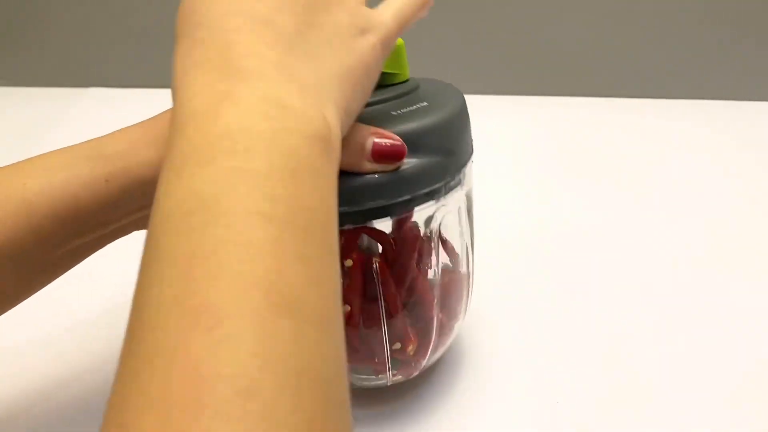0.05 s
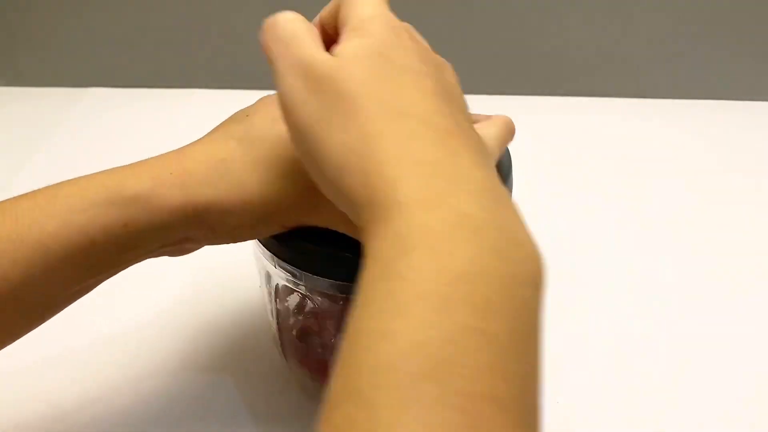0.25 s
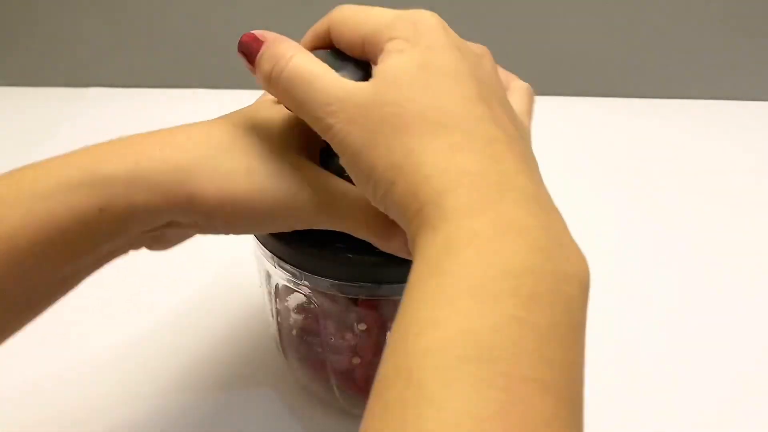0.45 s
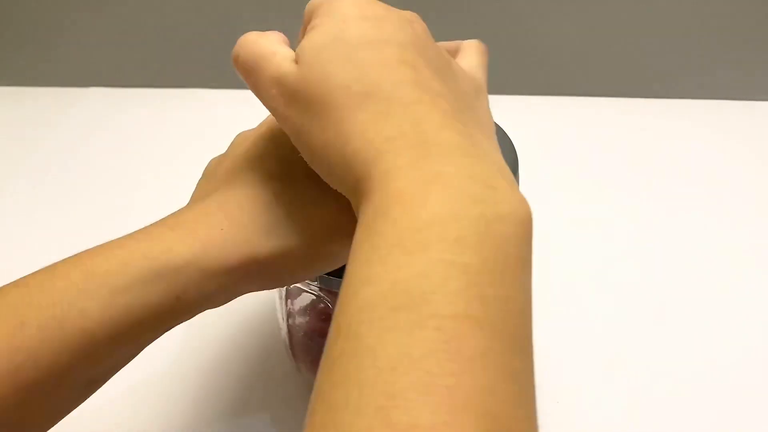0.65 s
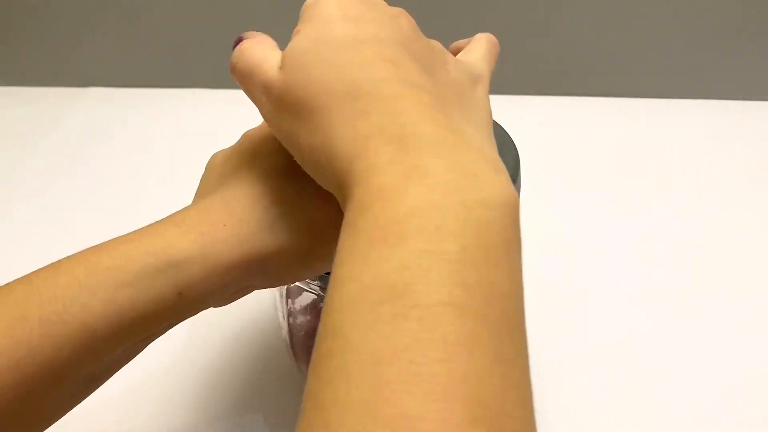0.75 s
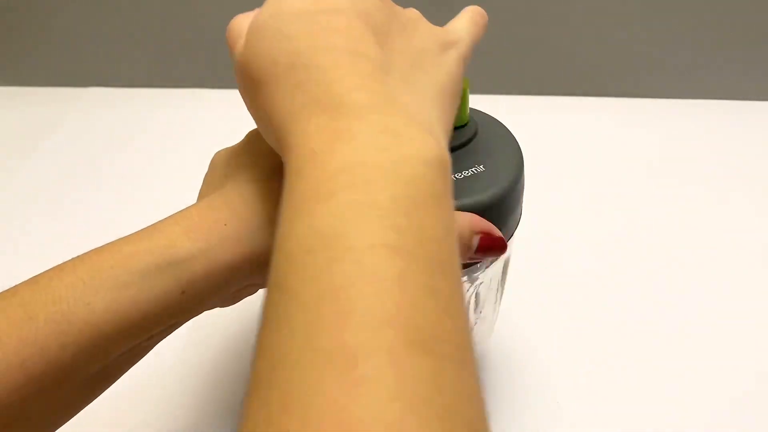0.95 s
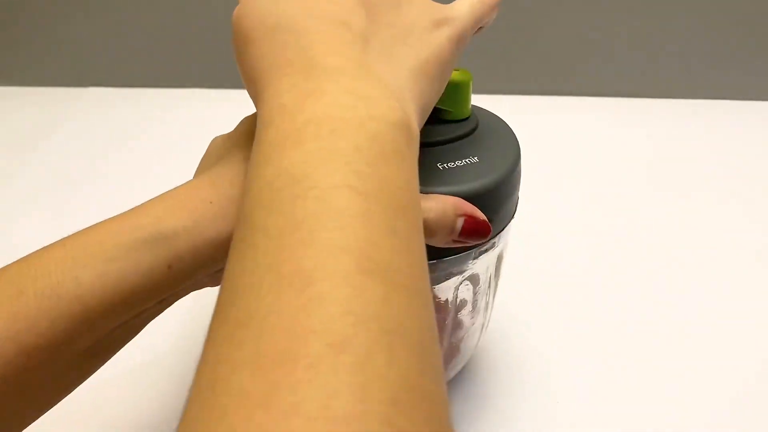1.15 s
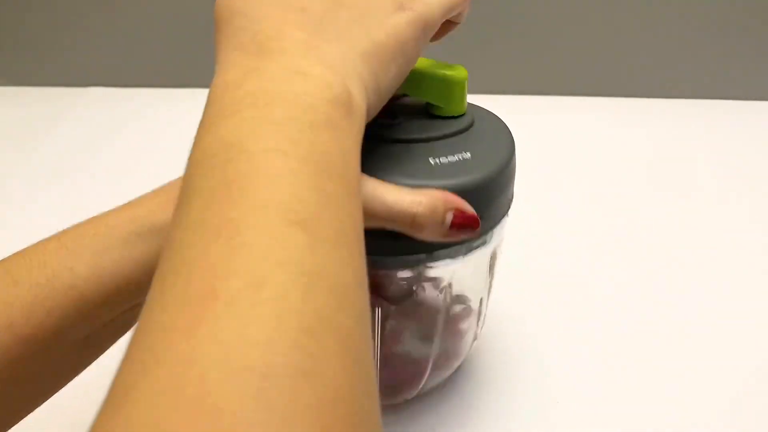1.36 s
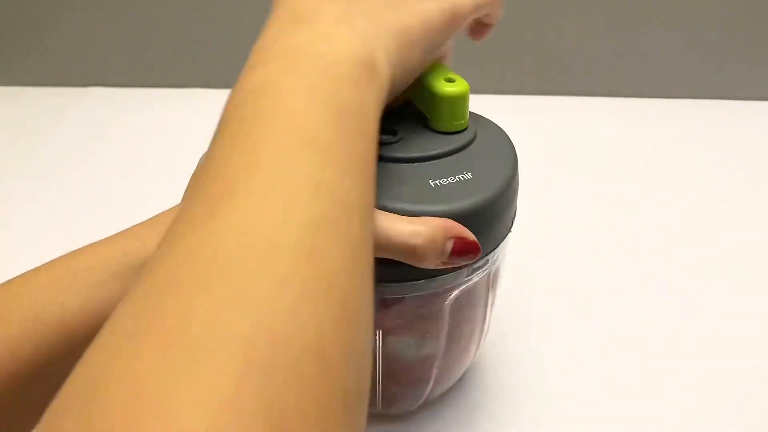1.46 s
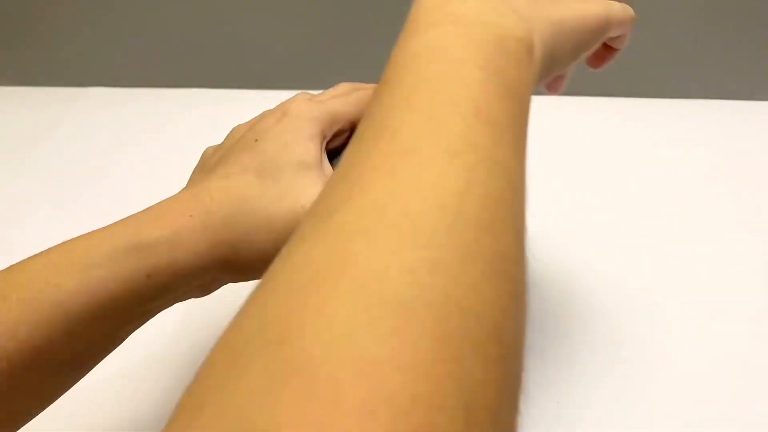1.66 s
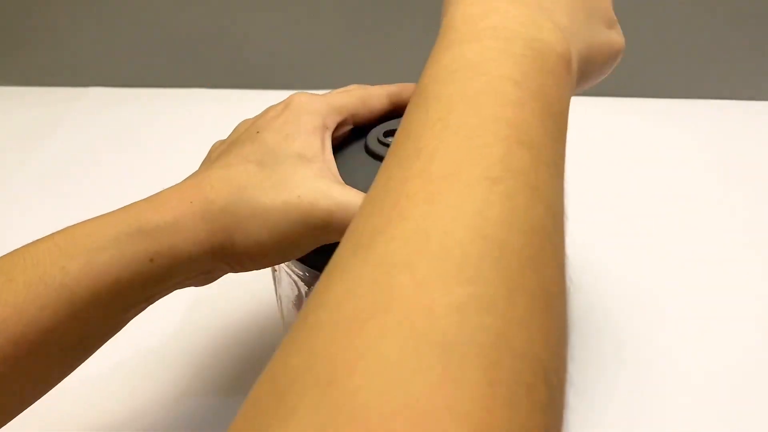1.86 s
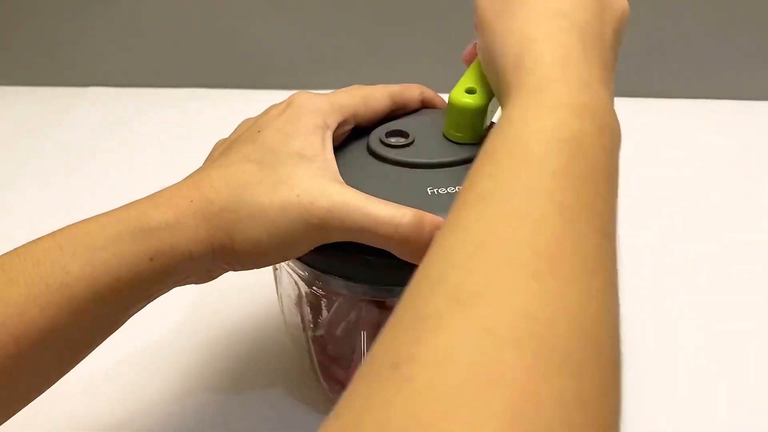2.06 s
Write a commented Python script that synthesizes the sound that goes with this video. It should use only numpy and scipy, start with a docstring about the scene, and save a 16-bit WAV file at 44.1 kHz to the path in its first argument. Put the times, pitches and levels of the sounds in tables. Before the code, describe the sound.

Dry chillies crunch in a hand-worked chopper, with table thumps, plastic clicks and one rough grinding burst.

```python
"""Blades of a hand-cranked plastic chopper crunch dry chillies in a weak and a strong burst: grains of
noise excite the jar's resonances, a broad crackle and a treble fizz, while the shaft rubs in the lid.
Plastic clicks and pod snaps are dying band-limited cracks that also ring the jar. Thumps of the jar and
continuous shaking drive the modes of a light kitchen table. Room tone and a faint mains hum lie behind."""
import sys
import numpy as np
from scipy import signal
from scipy.fft import rfft, irfft, next_fast_len
from scipy.io import wavfile

SR = 44100
rng = np.random.default_rng(int(sys.argv[2]) if len(sys.argv) > 2 else 0)


def file_out(sig):
    """Save sig as 16-bit WAV at sys.argv[1]."""
    # one column per channel
    cols = np.atleast_2d(sig).T
    # limit, then scale
    lim = np.clip(cols, -1, 1)
    pcm = np.round(lim * 32767).astype(np.int16)
    wavfile.write(sys.argv[1], SR, pcm)


def elevation(decibels):
    """Turn decibel levels (scalar or array-like) into linear amplitude ratios."""
    levels = np.asarray(decibels, float)
    return 10 ** (levels / 20)


N = 92610
T = np.arange(N) / SR


def unit(x):
    """Power normalization: scales x to rms 1."""
    return x / np.sqrt(np.mean(x ** 2) + 1e-20)


def along(points, hz):
    """Logarithmic frequency scale: interpolates (f, value) points on it."""
    f, value = np.transpose(points)
    return np.interp(np.log(hz + 1), np.log(f + 1), value)


def curves(rows):
    """Amplitude envelope: one gain per sample for each dB column."""
    s, *columns = np.transpose(rows)
    return [elevation(np.interp(T, s, column)) for column in columns]


def filtered(x, response):
    """Linear filtering: multiplies the spectrum of x by a complex response."""
    n = x.shape[-1]
    padded = next_fast_len(n + SR // 2)
    spectrum = rfft(x, padded) * response(np.fft.rfftfreq(padded, 1 / SR))
    return irfft(spectrum, padded)[..., :n]


def peaks(rows):
    """Modal superposition: causal response of (f/Hz, width/Hz, level/dB) resonances, alternating in sign."""
    def response(f):
        total = 0
        for k, (centre, width, db) in enumerate(rows):
            damping = 1j * f * width
            total = total + (-1) ** k * elevation(db) * damping / (centre ** 2 - f ** 2 + damping)
        return total
    return response


def colour(points):
    """Spectral envelope: zero-phase response of (f/Hz, level/dB) points."""
    return lambda hz: elevation(along(points, hz))


def gain_into(response, x):
    """Power conservation: filters x so that white noise would keep its level."""
    power_gain = np.mean(abs(response(np.fft.rfftfreq(SR, 1 / SR))) ** 2)
    return filtered(x, response) / np.sqrt(power_gain)


# Likeness of the left and right sound: f/Hz, correlation/1
LIKENESS = [(60, 0.97), (250, 0.95), (500, 0.27), (1500, 0.5), (3000, 0.47), (5000, 0.38), (8000, 0.25),
            (14000, 0.3)]


def spread(pair):
    """Interchannel coherence: mixes two versions of a sound into partly correlated left and right."""
    def shares(hz):
        angle = np.arccos(np.clip(along(LIKENESS, hz), -1, 1)) / 2
        return np.array([np.cos(angle), np.sin(angle)])
    mid, side = filtered(pair, shares)
    return np.array([mid + side, mid - side])


# Reverberation of the kitchen: f/Hz, t60/s
ROOM_DECAY = [(150, 0.98), (1000, 0.7), (4000, 0.86), (12000, 0.26)]


def room(x, wet_db):
    """Diffuse reverberation: a noise tail, 5 ms late, in which each frequency dies at its own speed."""
    hz, t, noise = signal.stft(rng.standard_normal((2, SR // 2)), SR, nperseg=256)
    decay = elevation(-60 * t / along(ROOM_DECAY, hz)[:, None])
    tail = signal.istft(noise * decay, SR, nperseg=256)[1]
    late = np.pad(x, (SR // 200, 0))
    wet = signal.fftconvolve(late[None], tail / np.linalg.norm(tail[0]), axes=1)
    return elevation(wet_db) * wet[:, :len(x)]


# Spectral density of the room tone: f/Hz, relative level/dB
TONE_DENSITY = [(25, -5.5), (55, -10.5), (110, -4), (135, -19.5), (200, -15), (430, -26.5), (700, -26),
                (1200, -35.5), (1900, -30), (2400, -36.5), (4500, -45.5), (7700, -53), (9300, -68.5),
                (16000, -77)]
TONE_DB = -49.5
HUM_HZ, HUM_DB = 100, -50


def room_tone():
    """Stationary noise with a spectral envelope, and a sinusoidal mains hum alike in both channels."""
    noise = filtered(rng.standard_normal((2, N)), colour(TONE_DENSITY))
    hum = elevation(HUM_DB) * np.sqrt(2) * np.sin(2 * np.pi * HUM_HZ * T)
    return spread(elevation(TONE_DB) * unit(noise)) + hum


# Modes of the table top: f/Hz, relative level/dB, t60/s
TABLE_MODES = [(60.5, -9, 0.92), (79.95, -5, 0.69), (100.58, 2, 0.52), (122.8, -3, 0.14), (151.5, -2, 0.84),
               (167.9, -6.5, 0.75), (207.3, -8.5, 0.29), (264, -13, 0.46), (302.3, -13, .35),
               (349.3, -13.5, 0.098), (411.3, -15, 0.097), (473.2, -17.5, 0.15), (541.7, -10.5, 0.25),
               (650, -15.5, 0.067), (779.4, -10, 0.31), (860, -17.5, 0.45)]


def table_response():
    """Modal damping: the width of each table resonance follows from its decay time."""
    return peaks([(hz, np.log(1000) / np.pi / t60, db) for hz, db, t60 in TABLE_MODES])


# Blows of the jar on the table: t/s, peak level of the table ring/dB, time to the peak of the push/ms
THUMPS = [(0.2382, -28, 0.14), (0.2427, -7.5, 0.57), (0.298, -20.5, 0.68), (0.571, -34.5, 2.2),
          (0.618, -31, 7), (1.406, -21, 1.45), (1.778, -33.5, 1.26)]
# The jar's base, quickly damped: f/Hz, width/Hz, relative level/dB
BASE_MODES = [(164, 27, 8.5), (392, 50, -11.5), (700, 40, -1.5)]
BASE_DB = -6  # peak of the base's knock relative to the table ring


def thumps():
    """Impulsive excitation: each short push rings the table's modes and knocks the jar's base."""
    out = np.zeros((2, N + SR))  # second row: what differs between the channels, here nothing
    t_ms = np.arange(SR) / SR * 1000
    for s, db, rise_ms in THUMPS:
        push = t_ms / rise_ms * np.exp(-t_ms / rise_ms)
        ring = filtered(push, table_response())
        knock = filtered(push, peaks(BASE_MODES))
        blow = ring / abs(ring).max() + elevation(BASE_DB) * knock / abs(knock).max()
        out[0, round(s * SR):][:SR] += elevation(db) * blow
    return out[:, :N]


# Hands and blades shaking the table: t/s, slow sway level/dB, quick chatter level/dB
SHAKE = [(0, -36, -87), (.09, -74, -59.5), (.2, -41, -60), (0.298, -30.5, -32.5), (0.499, -39, -58),
         (0.682, -43, -55), (.86, -51.5, -67), (0.919, -49, -42), (0.978, -28.5, -40.5),
         (1.039, -43, -48.5), (1.1, -57, -54.5), (1.21, -60, -56.5), (1.34, -44.5, -53.5),
         (1.378, -32.5, -30.5), (1.418, -26, -17.5), (1.5, -30.5, -28), (1.601, -33, -29),
         (1.668, -35, -35.5), (1.708, -33, -35.5), (1.778, -69, -47.5), (1.85, -52, -50),
         (1.95, -67, -60.5), (2.049, -37, -49), (2.1, -76, -84)]
# Colour of the slow force: f/Hz, relative level/dB
SWAY = [(40, 6.5), (105, 3), (140, -20), (250, -29)]
# Colour of the quick force: f/Hz, relative level/dB
CHATTER = [(60, -73), (110, -14), (150, 3.5), (300, 4.5), (600, -7.5), (1000, -10.5)]


def shaking():
    """Forced vibration: slow and quick random forces drive the table's modes continuously."""
    modes = table_response()
    out = np.zeros((2, N))
    for level, force in zip(curves(SHAKE), (SWAY, CHATTER)):
        driven = lambda f: modes(f) * elevation(along(force, f))
        out += gain_into(driven, level * rng.standard_normal((2, N)))
    return out


# Resonances of the jar: f/Hz, width/Hz, relative level/dB
JAR_MODES = [(493, 41.6, 8), (705, 20, -16.5), (890, 162, 1.5), (1200, 148, 4.5), (1613, 160, -9.5),
             (1780, 50, -4.5), (2200, 460, -9), (2890, 120, -35), (3700, 510, -13), (4200, 370, -14),
             (4610, 330, -14)]


def jar_response():
    """Modal resonance: the response of the plastic jar."""
    return peaks(JAR_MODES)


# Plastic clicks and pod snaps: t/s, level/dB, centre f/Hz, band reach to each side/octave, t60/s
CLICKS = [(.239, -30.5, 795, 1.44, 0.032), (0.264, -40, 1900, 1.1, 0.039), (0.28, -21, 1574, 0.33, 0.055),
          (.288, -36, 1830, 1, 0.03), (.305, -43, 1800, 0.17, 0.12), (.339, -46.5, 6000, 0.53, 0.057),
          (0.403, -47.5, 5130, 0.62, 0.038), (0.422, -41, 5700, 0.64, .04), (.445, -47.5, 6500, 1, 0.014),
          (.509, -42, 700, 0.54, 0.062), (.531, -36, 1470, 0.35, 0.08), (0.676, -47, 2040, 0.99, 0.032),
          (.929, -39, 2470, 0.89, .02), (0.9381, -22, 3100, 0.54, 0.053), (1.037, -32.5, 1460, 0.38, .025),
          (1.072, -36, 1480, 0.19, 0.01), (1.103, -50, 1740, 0.15, 0.29), (1.159, -48, 1510, 0.45, 0.045),
          (1.252, -46, 1400, 0.71, 0.036), (1.268, -43, 1370, 0.42, 0.087), (1.284, -47, 1800, 0.29, 0.021),
          (1.364, -42, 4500, 0.77, 0.04), (1.369, -31.5, 1230, 0.37, 0.064), (1.373, -29, 1630, 0.29, 0.15),
          (1.408, -16.5, 2240, 0.51, 0.026), (1.419, -16.5, 1670, 0.37, 0.01),
          (1.431, -14.5, 2200, 0.37, 0.095), (1.46, -25.5, 2600, 1.2, 0.022),
          (1.489, -24, 8000, 1.1, 0.057), (1.616, -26.5, 2740, 0.49, 0.01),
          (1.68, -28.5, 1220, 0.11, 0.033), (1.702, -31, 1690, 1.2, 0.022), (1.786, -71, 4500, .6, 0.01),
          (1.803, -31.5, 4200, 0.85, 0.038), (1.805, -39.5, 12100, 0.36, 0.023),
          (2.043, -51, 1970, 1.1, 0.04), (2.059, -39.5, 650, 0.26, 0.036)]
CLICK_ROOM_DB = -10.5
SNAP_DB, SNAP_T60_S = 8, .002  # sharp front of each click, relative to its body


def clicks():
    """Transient excitation: each dying crack in its own band also rings the jar and the room."""
    out, t = np.zeros((2, N + SR)), np.arange(SR // 4) / SR
    for s, db, hz, octaves, t60 in CLICKS:
        edge = 2 ** octaves
        limits = [hz / edge, min(hz * edge, SR / 2.2)]
        band = signal.butter(2, limits, "band", fs=SR, output="sos")
        envelope = elevation(-60 * t / t60) + elevation(SNAP_DB - 60 * t / SNAP_T60_S)
        crack = rng.standard_normal((2, len(t))) * envelope
        ring = gain_into(jar_response(), crack)
        crack = signal.sosfilt(band, crack + elevation(2.5) / 2 * ring)
        # the rms of the first 5 ms is set to a third of the level, so that it stands near the peak
        crack = elevation(db) * crack / np.sqrt(np.mean(crack[:, :SR // 200] ** 2)) / 3
        out[:, round(s * SR):][:, :len(t)] += spread(crack) + room(crack[0], wet_db=CLICK_ROOM_DB)
    return out[:, :N]


# The blade shaft rubbing in the lid: t/s, level/dB
RUB = [(.93, -95), (.97, -45.5), (1.02, -52.5), (1.1, -77), (1.37, -105), (1.4, -30.5), (1.45, -34),
       (1.5, -24.5), (1.55, -34.5), (1.64, -38), (1.665, -46), (1.685, -35), (1.75, -50.5), (1.8, -73)]
RUB_HZ, RUB_WIDTH_HZ = 1190, 87


def rub():
    """Friction excitation: random noise sings in one narrow resonance."""
    level, = curves(RUB)
    return gain_into(peaks([(RUB_HZ, RUB_WIDTH_HZ, 0)]), level * rng.standard_normal((2, N)))


GRAINS_PER_S, GRAIN_SPREAD_DB, GRAIN_T60_S = 800, 3.5, .006
BED_SHARE = .35  # share of the power in the steady bed


def grit():
    """Granular noise: random cracks of uneven size over a fine bed, two noises under one envelope."""
    sizes = elevation(GRAIN_SPREAD_DB * rng.standard_normal(N))
    hits = (rng.random(N) < GRAINS_PER_S / SR) * sizes
    decay = elevation(-60 * np.arange(SR // 50) / SR / GRAIN_T60_S)
    cracks = np.convolve(hits, decay)[:N]
    power = BED_SHARE + (1 - BED_SHARE) * unit(cracks) ** 2
    return np.sqrt(power) * rng.standard_normal((2, N))


# Crunching: t/s, body level/dB, treble fizz level/dB
CRUNCH = [(0, -59.5, -81.5), (.23, -99, -69), (.25, -48, -83), (.32, -51.5, -90), (.4, -66.5, -60),
          (.43, -58.5, -59), (.5, -69, -68), (.62, -82, -76), (.68, -62.5, -77), (.76, -69, -80),
          (.86, -68, -83), (.92, -49, -60), (.95, -45.5, -55), (.99, -44, -68), (1.06, -61, -73),
          (1.12, -93, -79), (1.22, -86, -75), (1.34, -65, -106), (1.37, -40.5, -48.5), (1.4, -37, -44.5),
          (1.43, -25.5, -27), (1.5, -30, -35.5), (1.6, -32, -38.5), (1.65, -40, -46.5), (1.67, -46.5, -51),
          (1.7, -38.5, -45), (1.73, -48.5, -54.5), (1.78, -53.5, -55.5), (1.84, -60.5, -59),
          (1.93, -119, -75), (2, -87, -89), (2.05, -64, -79), (2.1, -93, -71)]
# Broad part of the crunch: f/Hz, relative level/dB
CRACKLE = [(150, -14), (300, -13.5), (700, -5.5), (1500, -23.5), (3000, -7), (6000, -30.5), (9000, -28)]
# Relative level of the treble noise at each frequency: f/Hz, relative level/dB
FIZZ = [(2500, 11), (3500, 11), (5000, -2.5), (6000, 2.5), (8200, 6.5), (8600, -39), (9400, -21.5),
        (9800, 0), (12400, 6.5), (12700, -25), (13500, -26), (13800, 1.5), (15800, 7.5), (16000, -51)]
JAR_TOP_HZ = 6500  # the plastic wall carries little above this


def crunch():
    """Source-filter principle: cracking pods excite the jar and a broad crackle; seeds add a fizz."""
    body, fizz = curves(CRUNCH)

    def wall(f):
        return jar_response()(f) / (1 + (f / JAR_TOP_HZ) ** 6) + elevation(along(CRACKLE, f))
    return gain_into(wall, body * grit()) + gain_into(colour(FIZZ), fizz * grit())


# Stereo balance: f/Hz, left over right level/dB
LEFT_OVER_RIGHT = [(60, 4.5), (300, 2), (700, 4.5), (2000, 3), (8000, .5)]
LEAD_MS = .015  # the left channel leads the right
ROOM_DB = -21.5


def scene():
    """Superposition and interchannel differences: the mix stands a little to the left in level and time."""
    pods = crunch() + rub()
    near = spread(thumps() + shaking() + pods) + room(pods[0], wet_db=ROOM_DB)

    def to_left(hz):
        gain = elevation(np.outer([.5, -.5], along(LEFT_OVER_RIGHT, hz)))
        phase = np.pi * np.outer([1, -1], hz) * LEAD_MS / 1000
        return gain * np.exp(1j * phase)
    return filtered(near + clicks() + room_tone(), to_left)


def top_cut(x):
    """Nothing passes above the cut-off."""
    return signal.sosfilt(signal.butter(12, 16470, fs=SR, output="sos"), x)


LOW_CUT_HZ, TOP_HZ = 38, 16000


def record(dry):
    """Band limitation: the microphone's bass cut and steep treble limit."""
    bass_cut = signal.butter(4, LOW_CUT_HZ, "high", fs=SR, output="sos")
    cut = signal.sosfilt(bass_cut, dry)
    mix = filtered(cut, lambda hz: 1 / (1 + (hz / TOP_HZ) ** 100))
    return top_cut(mix)


dry = scene()
out = record(dry)
file_out(out)
```